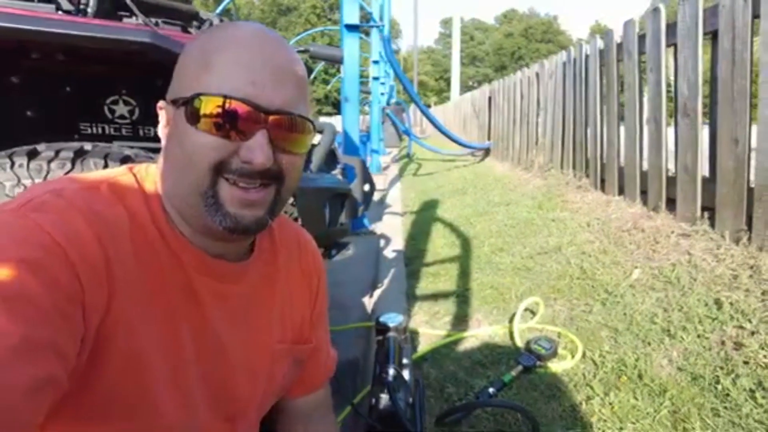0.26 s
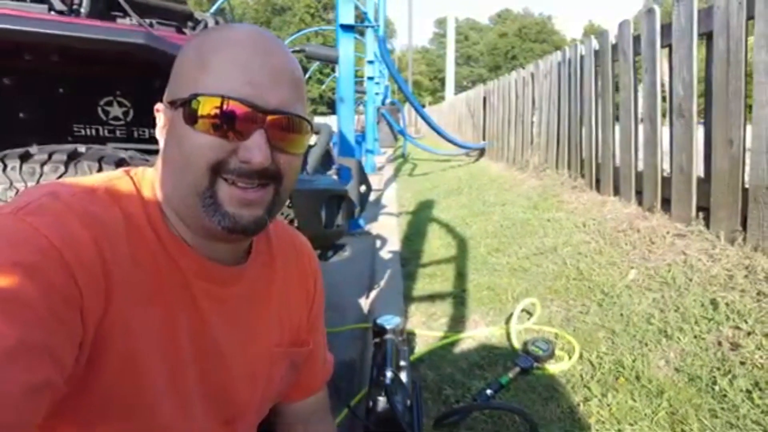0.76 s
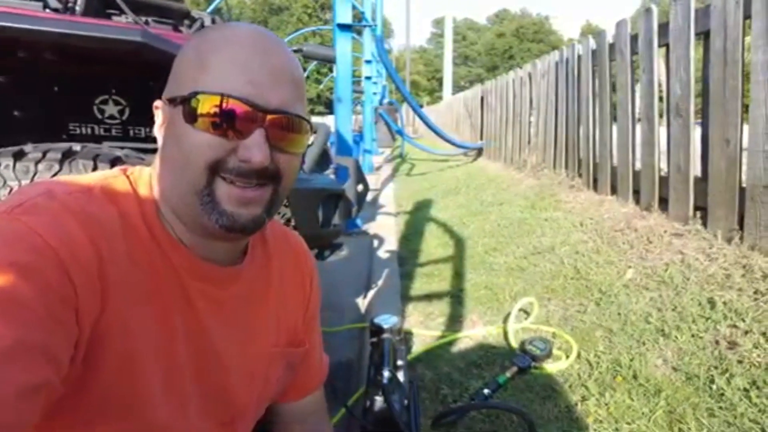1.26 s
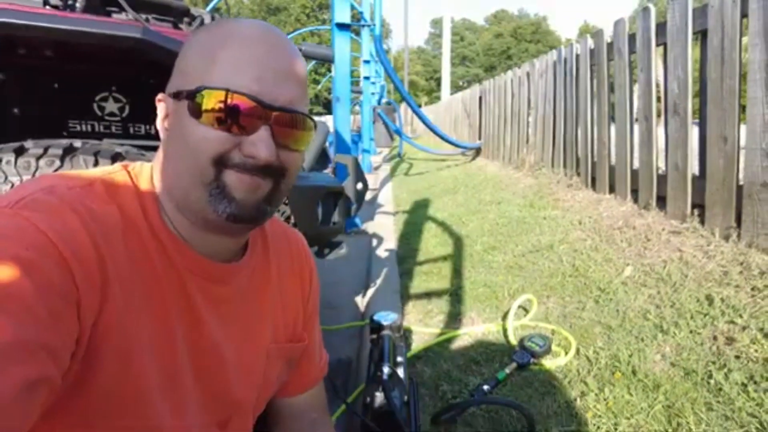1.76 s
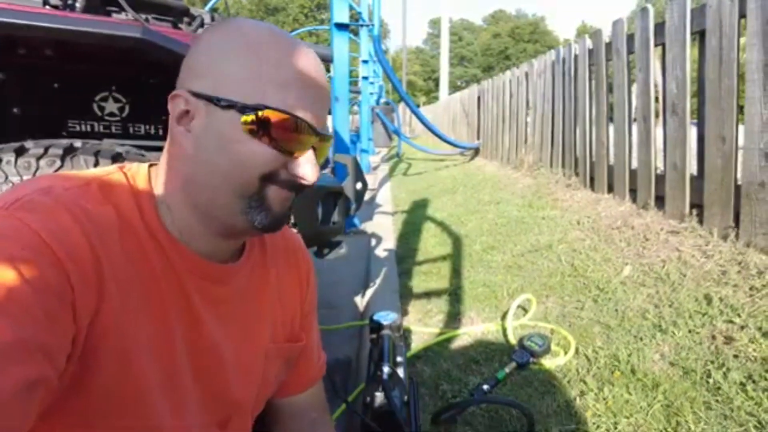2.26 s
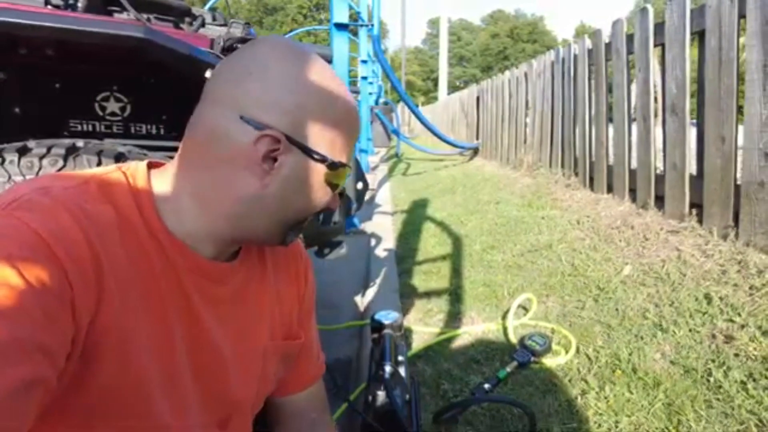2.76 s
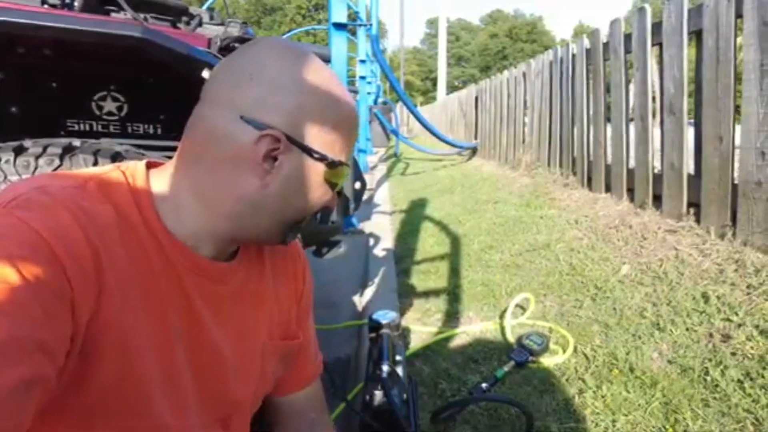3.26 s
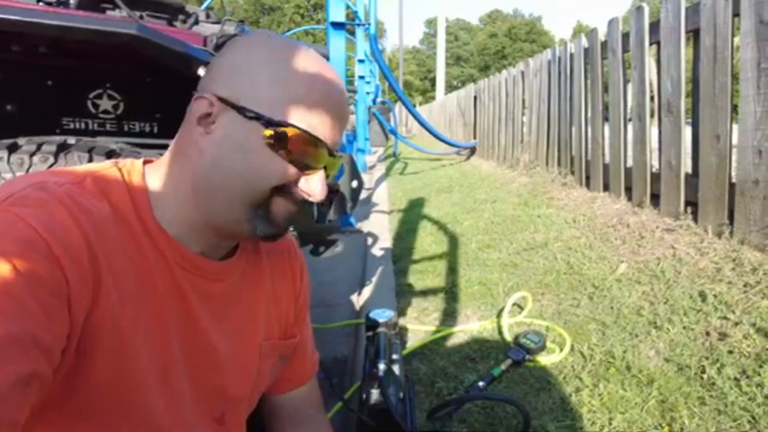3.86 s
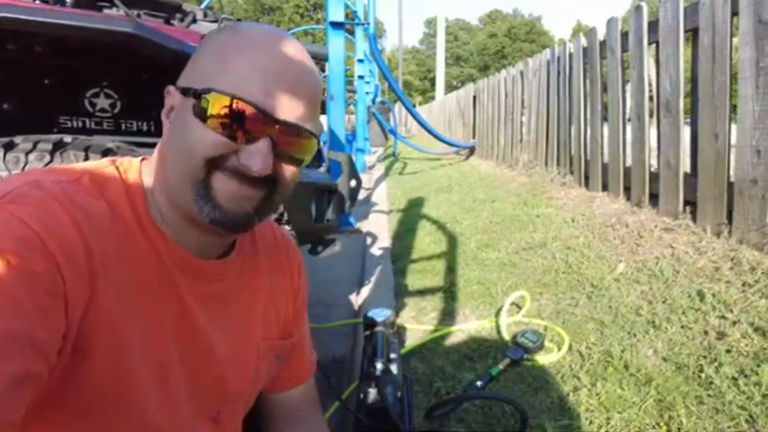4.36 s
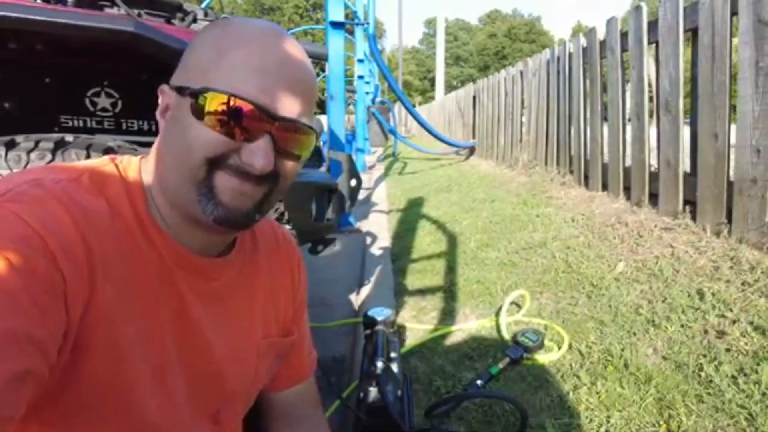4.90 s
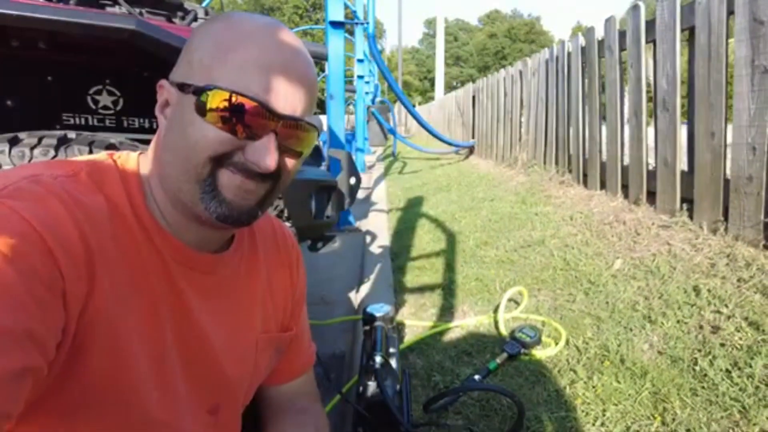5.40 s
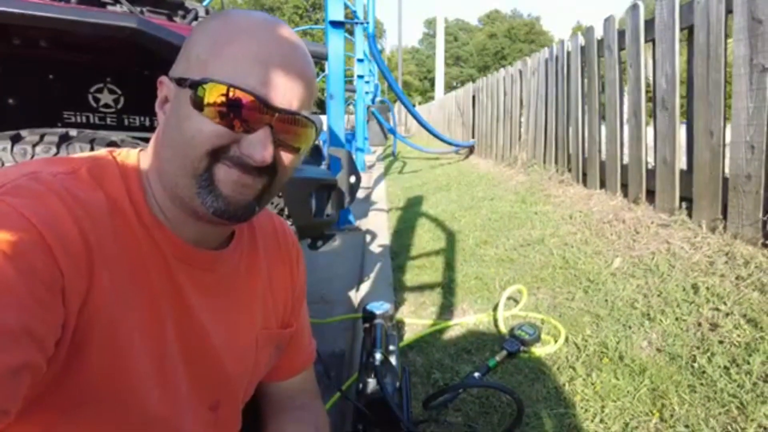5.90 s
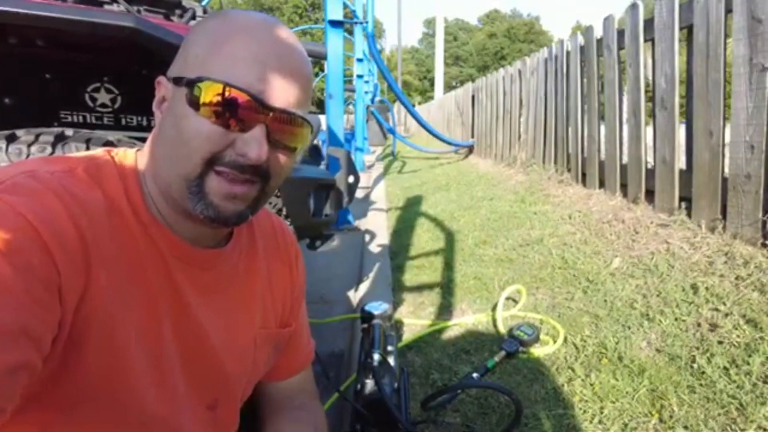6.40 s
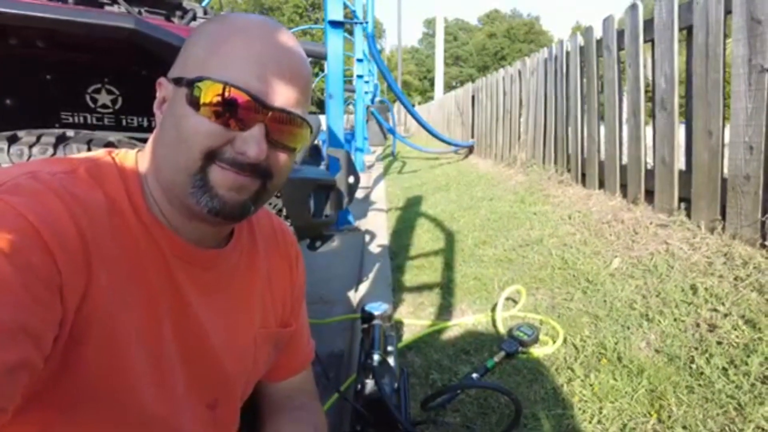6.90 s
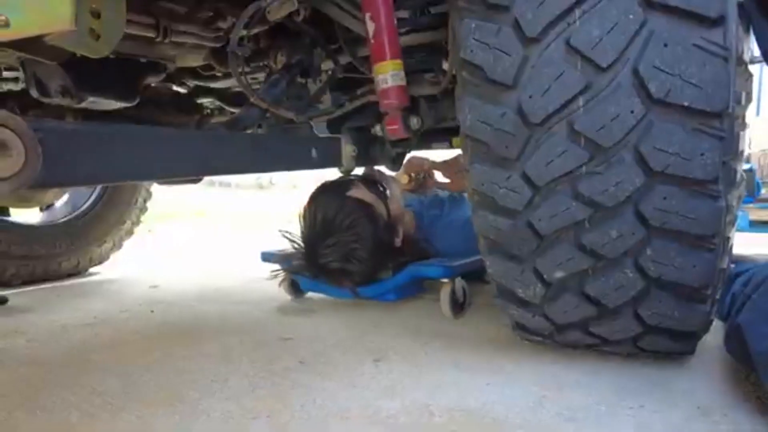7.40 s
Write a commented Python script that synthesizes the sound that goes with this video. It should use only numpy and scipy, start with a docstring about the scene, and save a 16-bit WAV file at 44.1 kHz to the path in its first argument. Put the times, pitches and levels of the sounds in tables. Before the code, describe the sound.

Outdoors, a portable air compressor runs close by with a steady motor hum, a fast rattle and a thin hiss as it fills a tire. An off-road vehicle idles with a low rumble beside it, and a distant truck pulls away. After about seven seconds the din cuts off at once, leaving a faint idle, a puff of wind on the microphone and a few light metal knocks under the vehicle.

```python
"""Tyre compressor beside an idling engine

A portable compressor hums, rattles and hisses as it fills a tyre outdoors. An off-road vehicle idles with its
bonnet open, and a distant truck pulls away. Rotation gives harmonics, impacts give pulsed noise. The din ends
at once as the scene changes to a faint idle, wind on the microphone and knocks of work under the vehicle."""
import sys
import numpy as np
from scipy import signal
from scipy.fft import rfft, irfft, next_fast_len
from scipy.io import wavfile
from scipy.ndimage import uniform_filter1d

SR = 44100
rng = np.random.default_rng(int(sys.argv[2]) if len(sys.argv) > 2 else 0)


def to_wav(s):
    """Save 16-bit WAV."""
    ch = np.atleast_2d(s).T  # columns
    pcm = np.round(np.clip(ch, -1, 1) * 32767)  # PCM
    wavfile.write(sys.argv[1], SR, pcm.astype(np.int16))


N = 337359
TIME = np.arange(N) / SR

# Clatter spectrum of compressor and engine: frequency_hz, density_db
CLATTER = [(120, -65), (205, -50), (240, -58.5), (330, -57.5), (375, -57), (415, -62), (500, -57),
           (555, -55.5), (590, -58.5), (715, -56), (765, -63), (840, -57.5), (915, -58.5), (975, -59),
           (1130, -59), (1260, -57.5), (1405, -60), (1470, -64), (1600, -64), (1750, -66.5), (2200, -73.5),
           (3500, -77), (8000, -110)]


def compressor():
    """Forced vibration: the motor hums at shaft harmonics; pump strokes rattle and ring the metal."""
    # Motor harmonics: shaft_order, level_db, left_lead_rad
    orders = [(2, -38, -1), (5, -37, -0.55), (7, -42, -0.2), (9, -24.5, 0.58), (11, -47, -0.12),
              (13, -46, 0), (14, -39.5, 0.9), (16, -33.5, 0.86), (18, -35, 1), (20, -44, -0.19),
              (22, -48, 0), (23, -38.5, -1.34)]
    shaft_hz, throb_hz, housing_hz, metal_hz = 39.062, 6.25, 712, 1255
    turns = shaft_hz * TIME
    throb = np.cos(2 * np.pi * throb_hz * TIME + .5 * drift(1.9))
    hum = harmonics(turns, [row for row in orders if row[0] < 17], waver_db=.7, slip_rad=.055)
    whine = harmonics(turns, [row for row in orders if row[0] >= 17], waver_db=.7, slip_rad=.055)
    whine *= undb(2.2 * throb)
    strokes = impacts(2 * turns, decay_cycles=2.4, scatter_db=1.1, jitter_cycles=.075)  # intake, delivery
    force = undb(.75 * throb + .5 * drift(14)) * strokes
    rattle = unit(force * (noise() + .15 * periodic_noise(turns, shaft_hz)))
    housing_band = [(housing_hz * k, db) for k, db in [(.87, -70), (.985, 0), (1.015, 0), (1.13, -70)]]
    housing = undb(-40.5) * unit((1 + throb) * stereo(noise(), housing_band))
    metal_band = [(metal_hz * k, db) for k, db in [(.8, -70), (.97, 0), (1.03, 0), (1.25, -70)]]
    metal_db = -41.5 + 3.2 * ramp(2.3, .5) + 2 * throb  # the ring grows a little clearer
    metal = undb(metal_db) * unit(stereo(strokes * noise(), metal_band))
    return hum + whine + housing + metal + undb(-4.5) * stereo(rattle, CLATTER)


def high_hiss(flicker_db=2.1, grain_db=1.3):
    """Band-limited noise: a steady high air hiss, with a slight artificial flicker in each treble band."""
    # Hiss bands: centre_hz
    centres = [6000, 7500, 9000, 10500, 12000, 13500, 15000]
    # Hiss spectrum: frequency_hz, density_db
    spectrum = [(2000, -100), (6000, -91.5), (7500, -86.5), (8500, -90.5), (9300, -86.5), (10700, -88),
                (11600, -90.5), (13300, -86.5), (15000, -86)]
    # Shape of one band: offset_hz, gain_db
    band = [(-1300, -40), (-750, -3), (-450, 0), (450, 0), (750, -3), (1300, -40)]
    hiss = 0
    for hz in centres:
        flicker = np.minimum(drift(28) + drift(75), 1)
        modulated = unit(undb(flicker_db * flicker + grain_db * drift(600)) * noise())
        hiss += colour(modulated, [(hz + offset, db) for offset, db in band])
    return stereo(hiss, spectrum)


def engine(turns, firing_hz):
    """Periodic excitation: six cylinders boom at the firing rate and the valves tick, over a swelling low
    rumble."""
    # Drone harmonics: firing_order, level_db, left_lead_rad
    orders = [(2, -35.5, -0.28), (3, -31.5, -0.036), (4, -36, -1), (5, -32.5, -0.6), (6, -42, -0.54),
              (7, -39, 0), (9, -41.5, 0.1), (10, -38, -0.64), (11, -37.5, 0.85), (13, -44, 0.81),
              (14, -36.5, 1.47), (16, -37, 1.8), (18, -39.5, 0.9), (19, -54, 0), (20, -49, 0),
              (21, -39, 1.6), (23, -55, -0.16), (24, -40.5, 1.4), (25, -40.5, -0.021), (26, -45, 0.25),
              (27, -51, 0.42), (29, -45, 1), (30, -47, -1), (31, -45, -1.2), (32, -49.5, 0),
              (35, -49.5, 0.18), (37, -53, 0), (38, -52.5, 0), (39, -56, 0), (48, -57.5, -0.55),
              (52, -58, 0), (58, -61, 0), (62, -55, -0.17)]
    # Swell of the rumble, partly followed by the exhaust boom: time_s, gain_db
    swell = [(0, -1), (.3, 2.5), (.9, .5), (1.45, -2), (2.35, -1.5), (2.72, 3), (3.15, -.5), (3.35, -4),
             (3.55, 0), (4, .5), (4.2, 4), (4.45, 4), (4.65, 0), (5.3, 0), (5.75, 2.5), (6.3, 0), (6.8, 2),
             (7.1, 0)]
    # Low rumble spectrum: frequency_hz, density_db
    rumble_spectrum = [(3, -90), (20, -59), (35, -50), (60, -46), (85, -49.5), (115, -47.5), (165, -52.5),
                       (200, -54), (240, -62), (400, -80), (1500, -130)]
    # Valve tick spectrum: frequency_hz, density_db
    valve_spectrum = [(900, -73), (2000, -72), (2950, -73), (3700, -87), (4500, -78.5), (4900, -83.5),
                      (6150, -79), (6700, -121.5), (15000, -102)]
    # Injector click spectrum: frequency_hz, density_db
    injector_spectrum = [(2500, -100), (3800, -92.5), (6100, -83), (6800, -100), (15000, -110)]
    swell_db = np.interp(TIME, *np.transpose(swell))
    boom = undb(-22.5 + .82 * swell_db) * harmonics(turns, [(1, 0, 0)], waver_db=1.3, slip_rad=.1)
    crank = harmonics(turns / 3, [(2, -34, 0)], waver_db=-.5, slip_rad=.23)  # three firings a revolution
    drone = harmonics(turns, orders, waver_db=1, slip_rad=.095)
    blows = impacts(5 * turns, decay_cycles=.8, scatter_db=1.4, jitter_cycles=.08)
    load = undb(1.2 * np.cos(2 * np.pi * turns) + .7 * drift(10))
    each_cycle = periodic_noise(turns / 6, firing_hz.mean() / 6)
    each_firing = periodic_noise(turns, firing_hz.mean())
    clatter = unit(blows * load * (noise() + .5 * each_cycle + .25 * each_firing))
    valves = impacts(4 * turns, decay_cycles=1.6, scatter_db=1, jitter_cycles=.13)
    injectors = impacts(turns, decay_cycles=.17, scatter_db=2, jitter_cycles=.015)
    ticks = undb(.96 * drift(13)) * stereo(unit(valves * noise()), valve_spectrum)
    clicks = stereo(injectors * noise(), injector_spectrum)
    rumble = undb(swell_db) * stereo(noise(), rumble_spectrum)
    return boom + crank + drone + rumble + undb(-2.5) * stereo(clatter, CLATTER) + ticks + clicks


def truck_exhaust(shaft_hz, orders, roar_db):
    """Pipe resonance lifts each (shaft_order, level_db) passing through it; only low sound carries far."""
    # Exhaust pipe resonances: centre_hz, width_hz, lift_db
    pipe = [(78, 4, 7), (100.5, 3, 3), (122, 3, 5)]
    roar = stereo(noise(), [(40, -29), (70, -16), (125, -18), (165, -28), (200, -19), (350, -80)])
    turns = np.cumsum(shaft_hz) / SR
    drone = 0
    for order, level_db in orders:
        lift_db = sum(db * np.exp(-((order * shaft_hz - hz) / width) ** 2) for hz, width, db in pipe)
        drone += undb(lift_db) * harmonics(turns, [(order, level_db, 0)], waver_db=1.6, slip_rad=.44)
    return drone + undb(roar_db) * roar


def truck_cruising():
    """Pitch follows shaft speed: one exhaust order swells and fades as the truck gains a little speed."""
    # Waves of loudness: peak_s, length_s, level_db
    waves = [(0.0, 0.69, -27.5), (1.004, 0.9, -26.5), (2.4, 2.7, -31.5), (3.688, 0.88, -28)]
    cruise_hz, faster_hz = 24.5, 26.78
    shaft_hz = cruise_hz + (faster_hz - cruise_hz) * ramp(2.2, 1.13)
    gain = sum(undb(db) * np.sin(np.pi * ramp(peak_s, length_s)) for peak_s, length_s, db in waves)
    return gain * truck_exhaust(shaft_hz, [(4, -1.2)], roar_db=-2.5)


def truck_pulling_away():
    """Under throttle the shaft nears top speed exponentially, while the level falls with distance."""
    start_s, attack_s, recede_db_per_s = 4.62, .13, 1.3
    from_hz, top_hz, climb_s = 21, 26.9, .85
    age = np.maximum(TIME - start_s, 0)
    shaft_hz = top_hz - (top_hz - from_hz) * np.exp(-age / climb_s)
    gain = np.minimum(age / attack_s, 1) * undb(-23 - recede_db_per_s * age)
    return gain * truck_exhaust(shaft_hz, [(3, -8), (4, -5), (5, -6)], roar_db=-4.5)


def chassis_knocks():
    """Modal resonance: scraping blows ring the chassis, each spot favouring modes near its own pitch."""
    # Blows under the vehicle: start_s, level_db, relative_scrape_db, attack_s, t60_s, pitch_hz
    blows = [(7.151, -35.5, -11, 0.0007, 0.115, 1430), (7.195, -45, -16, .006, .1, 1420),
             (7.213, -34.5, -7, 0.0006, 0.08, 1420), (7.294, -46, -12, .004, .14, 1400),
             (7.357, -41.5, -20, .001, .14, 1460), (7.509, -33.5, -30, 0.0011, 0.13, 1850),
             (7.527, -38, -32, .002, .11, 2250), (7.628, -43, -14, .012, .3, 1400)]
    # Chassis modes: frequency_hz, bandwidth_hz, gain_db
    modes = [(200, 120, -3), (450, 250, 0), (780, 200, 0), (1030, 120, -1), (1450, 75, 2.5), (1840, 70, -1),
             (2120, 90, -4), (2380, 150, -5)]
    # Scrape spectrum: frequency_hz, gain_db
    scrape_spectrum = [(1000, 3), (3300, -2), (4800, -5), (7300, 1), (10000, -9), (15000, -7)]
    out = np.zeros((2, N))
    for start_s, level_db, scrape_db, attack_s, t60_s, pitch_hz in blows:
        age = np.maximum(TIME - start_s, 0)
        contact = noise()
        contact[1] = .74 * contact[0] + .58 * contact[1]  # partly alike in both ears
        ring = 0
        for hz, bandwidth_hz, mode_db in modes:
            favour_db = 9 * np.exp(-(np.log2(hz / pitch_hz) / .24) ** 2)
            resonator = signal.iirpeak(hz, hz / bandwidth_hz, fs=SR)
            ring += undb(mode_db + favour_db) * signal.lfilter(*resonator, contact)
        lowpass = signal.butter(7, min(1.6 * pitch_hz, 2300), fs=SR, output="sos")
        ring = unit(signal.sosfilt(lowpass, ring))
        scrape = undb(scrape_db) * np.exp(-5 * age / t60_s) * unit(colour(contact, scrape_spectrum))
        envelope = (1 - np.exp(-age / attack_s)) * undb(-60 * age / t60_s)
        out += undb(level_db) * envelope * (ring + scrape)
    return out


def faint_idle(turns):
    """A sparse harmonic series on the firing rate is heard under the vehicle."""
    return harmonics(turns, [(1, -47, 0), (5, -53, 0), (8, -62, 0), (10, -56, 0)], waver_db=2, slip_rad=.25)


def air_and_wind():
    """Low-frequency noise: quiet air lies under a gust that buffets the microphone."""
    # Quiet air spectrum: frequency_hz, density_db
    air_spectrum = [(20, -72), (100, -72), (250, -75), (430, -83), (600, -88), (1460, -89), (2100, -98),
                    (2800, -102), (3700, -109), (15000, -117)]
    # Wind spectrum: frequency_hz, density_db
    wind_spectrum = [(5, -90), (20, -62), (50, -55), (100, -57), (170, -64), (300, -77), (500, -95),
                     (1500, -140)]
    hush_db = 11 - 29 * ramp(7.111, .012) + 18 * ramp(7.133, .012)  # din drains, brief hush, air returns
    gust = ramp(7.135, .013) * undb(-1.5 - 17 * ramp(7.43, .047))
    return undb(hush_db) * stereo(noise(), air_spectrum) + gust * stereo(noise(), wind_spectrum)


def harmonics(turns, orders, waver_db, slip_rad):
    """Additive synthesis: each (order, level_db, left_lead_rad) wavers in level and phase."""
    out = np.zeros((2, N))
    for order, level_db, lead_rad in orders:
        phase = 2 * np.pi * (order * turns + rng.random()) + slip_rad * drift(14)
        amplitude = np.sqrt(2) * undb(level_db + waver_db * drift(9))
        out += amplitude * np.sin(phase + np.array([[lead_rad], [-lead_rad]]) / 2)
    return out


def impacts(cycles, decay_cycles, scatter_db, jitter_cycles):
    """Exponential decay: the envelope of one blow a cycle, uneven in timing and strength."""
    cycles = cycles + jitter_cycles * drift(120)
    index = np.floor(cycles - np.floor(cycles.min())).astype(int)
    strength = undb(scatter_db * rng.standard_normal(N // 20))
    envelope = strength[index] * np.exp(-(cycles % 1) / decay_cycles)
    return unit(uniform_filter1d(envelope, int(.0007 * SR)))  # 0.7 ms rise


def periodic_noise(turns, hz):
    """Periodicity: the same white clatter returns on every turn."""
    size = int(SR / hz)
    return rng.standard_normal((2, size))[:, (turns % 1 * size).astype(int)]


def stereo(pair, spectrum):
    """Mid-side mixing: two unrelated signals become coloured left and right, with the bass centred."""
    # Stereo width: frequency_hz, side_minus_mid_db
    width = [(60, -18), (110, -18), (200, -11), (380, -10), (700, -3), (1290, -5), (2380, -3.5), (4400, -1),
             (8120, -3), (15000, -13)]
    mid, side = colour(pair, spectrum) * np.sqrt(SR / 2)  # unit white noise to unit power per hertz
    return mid + np.array([[1], [-1]]) * colour(side, width)


def colour(x, points):
    """Spectral filtering by (frequency_hz, gain_db) points joined on a log-frequency axis."""
    size = next_fast_len(N + 8192)
    hz, db = np.transpose(points)
    bin_hz = np.maximum(np.arange(size // 2 + 1) * SR / size, 1)
    gain = undb(np.interp(np.log(bin_hz), np.log(hz), db))
    return irfft(rfft(x, size) * gain, size)[..., :N]


def drift(rate_hz):
    """Smooth random modulation of rms 1."""
    size = max(int(SR / rate_hz), 1)
    held = np.repeat(rng.standard_normal(N // size + 1), size)
    return unit(uniform_filter1d(uniform_filter1d(held, size), size)[:N])


def noise():
    """Two uncorrelated white noises."""
    return rng.standard_normal((2, N))


def ramp(middle_s, length_s):
    """A linear rise from 0 to 1 around a moment."""
    return np.clip((TIME - middle_s) / length_s + .5, 0, 1)


def unit(x):
    """Normalisation to rms 1."""
    return x / np.sqrt(np.mean(x ** 2))


def undb(db):
    """Decibels to amplitude ratio."""
    return 10 ** (np.asarray(db) / 20)


def scene():
    """Superposition: the machines sound together until the scene changes at once to the quiet underside."""
    idle_hz, sag_hz, cut_s = 49.355, .29, 7.087
    firing_hz = idle_hz - sag_hz * (ramp(1.17, .3) - ramp(2.5, .3))
    turns = np.cumsum(firing_hz) / SR  # one turn of phase per firing
    din = truck_cruising() + truck_pulling_away() + compressor() + high_hiss() + engine(turns, firing_hz)
    underside = faint_idle(turns) + air_and_wind() + chassis_knocks()
    second_scene = ramp(cut_s, .0053)
    return (1 - second_scene) * din + second_scene * underside


def record(dry):
    """Soft saturation and band limiting: the microphone favours the left, rounds peaks, cuts the top."""
    drive, top_hz = .7, 15050
    balance = undb([[.25], [-.25]])
    rounded = np.tanh(drive * dry * balance) / drive
    return signal.sosfilt(signal.ellip(10, .2, 80, top_hz, fs=SR, output="sos"), rounded)


dry = scene()
out = record(dry)
to_wav(out)
```